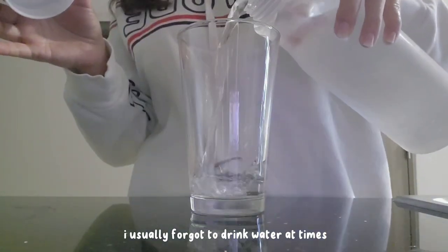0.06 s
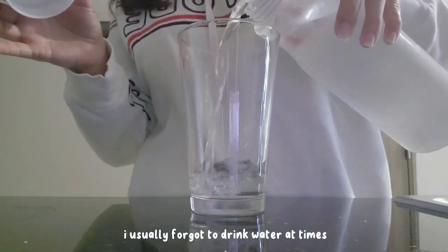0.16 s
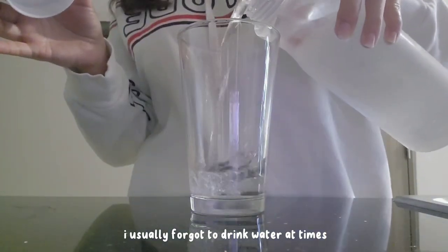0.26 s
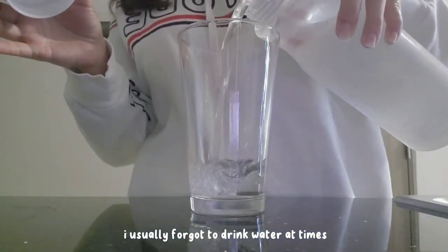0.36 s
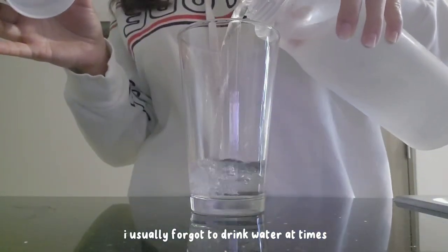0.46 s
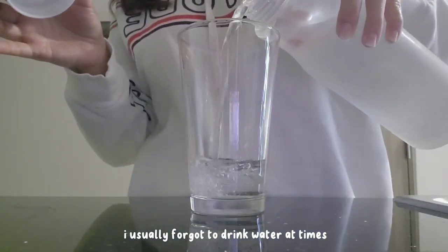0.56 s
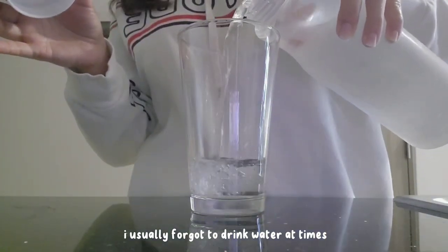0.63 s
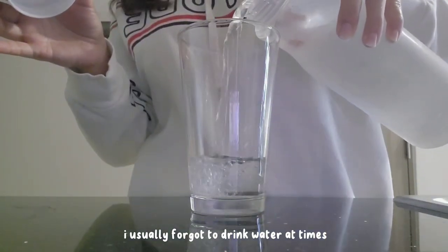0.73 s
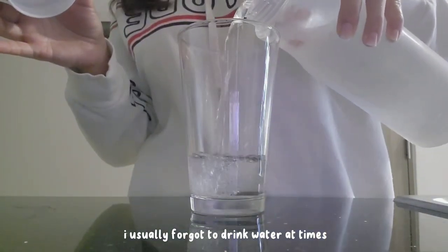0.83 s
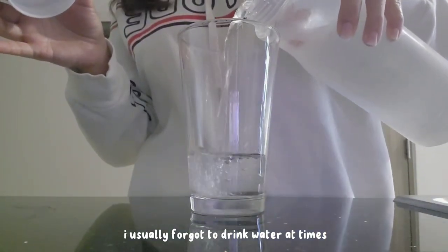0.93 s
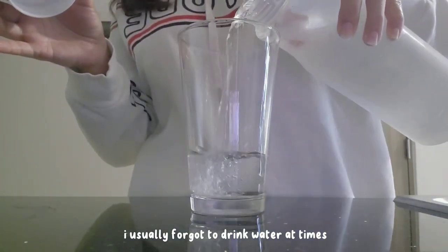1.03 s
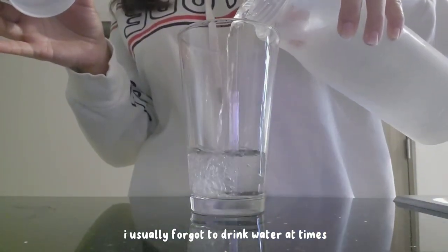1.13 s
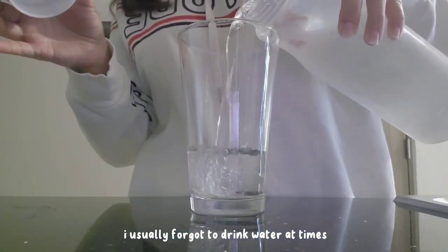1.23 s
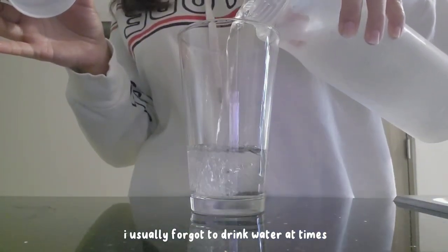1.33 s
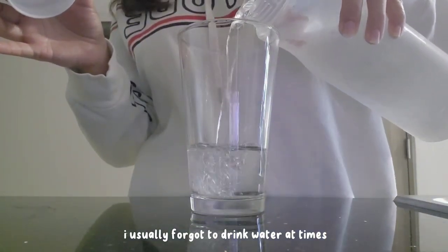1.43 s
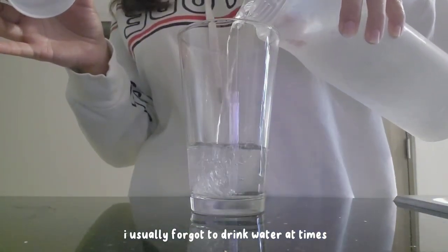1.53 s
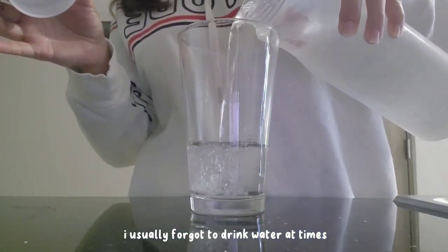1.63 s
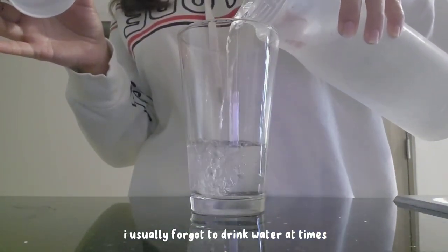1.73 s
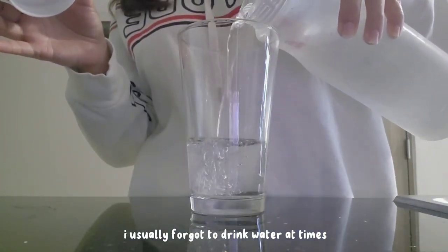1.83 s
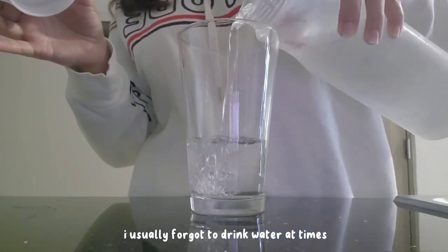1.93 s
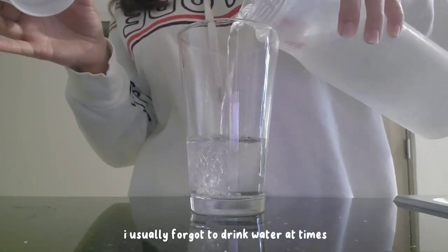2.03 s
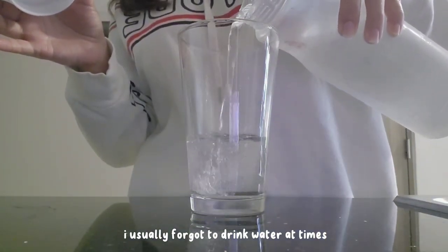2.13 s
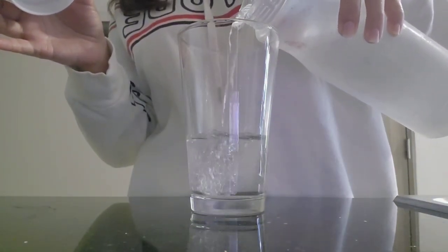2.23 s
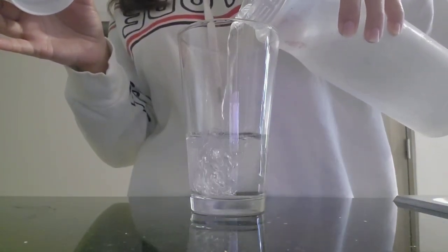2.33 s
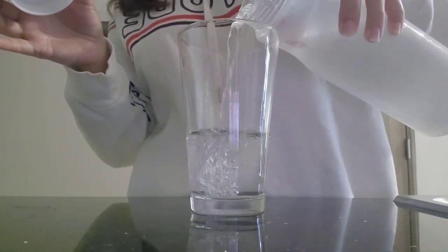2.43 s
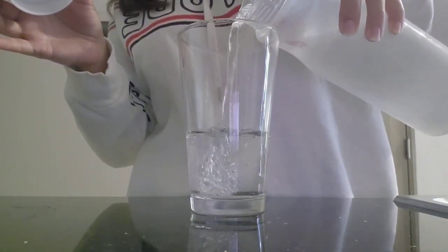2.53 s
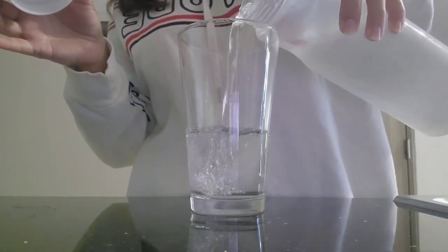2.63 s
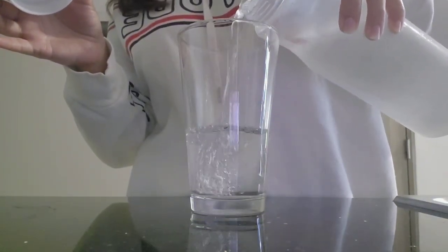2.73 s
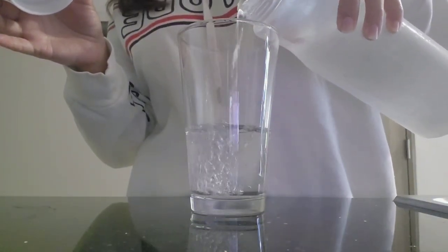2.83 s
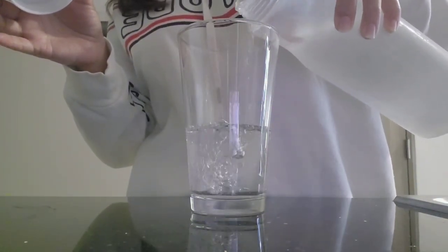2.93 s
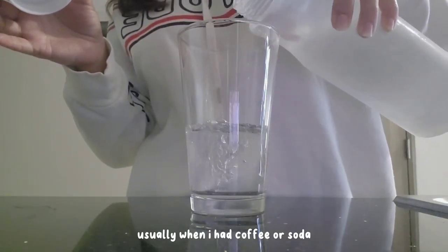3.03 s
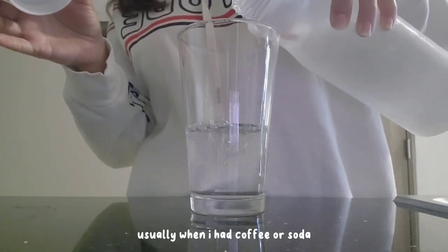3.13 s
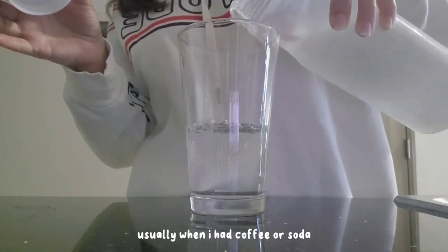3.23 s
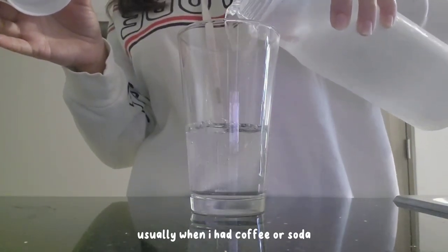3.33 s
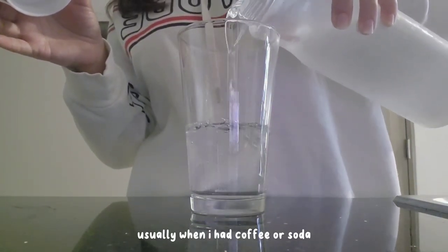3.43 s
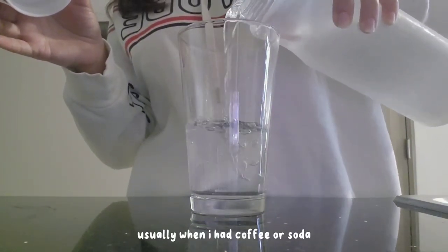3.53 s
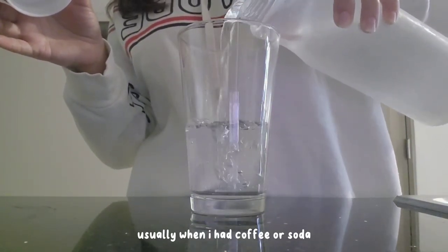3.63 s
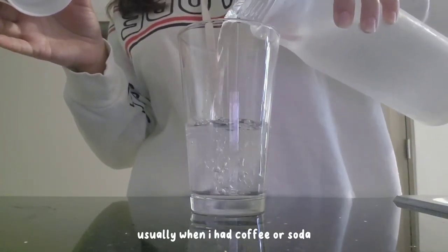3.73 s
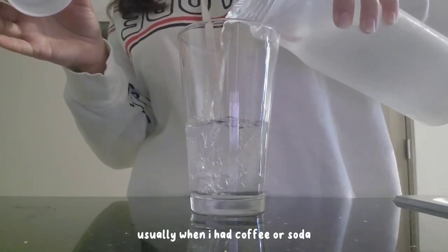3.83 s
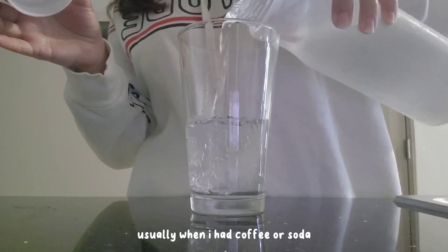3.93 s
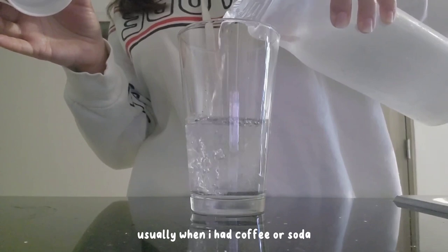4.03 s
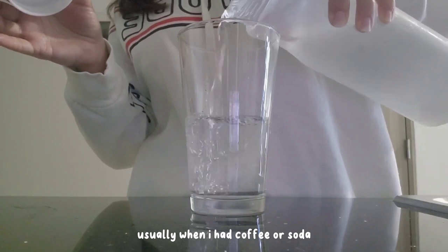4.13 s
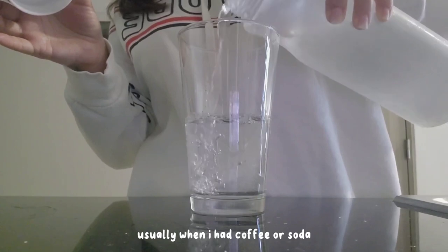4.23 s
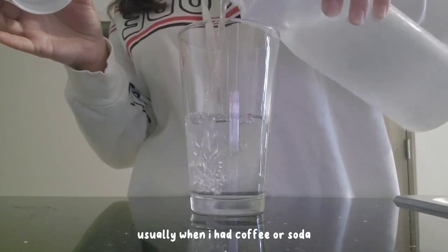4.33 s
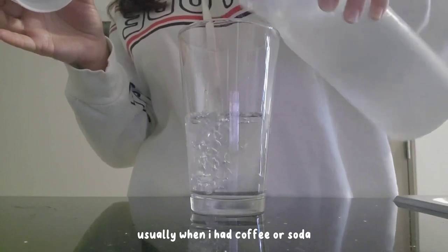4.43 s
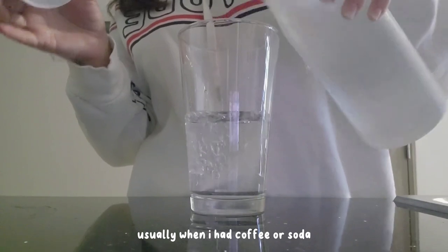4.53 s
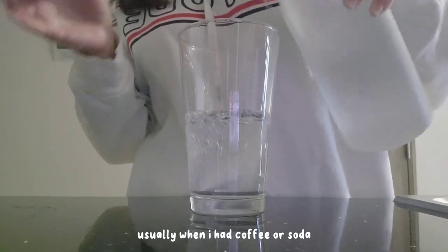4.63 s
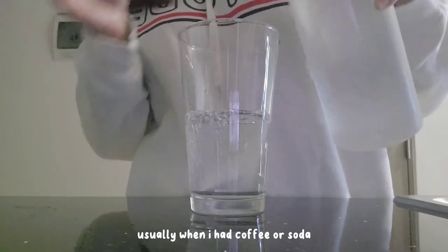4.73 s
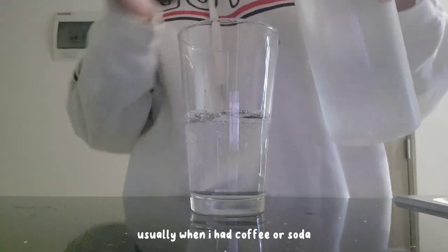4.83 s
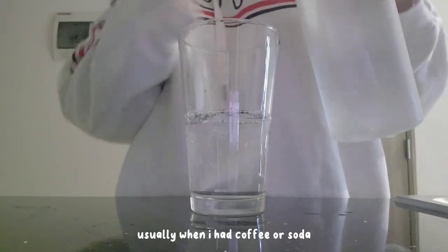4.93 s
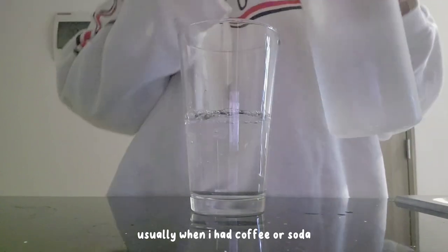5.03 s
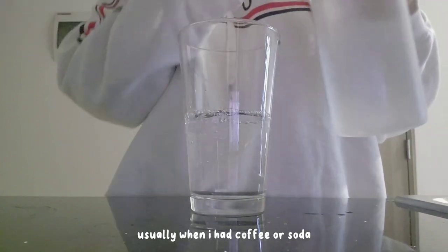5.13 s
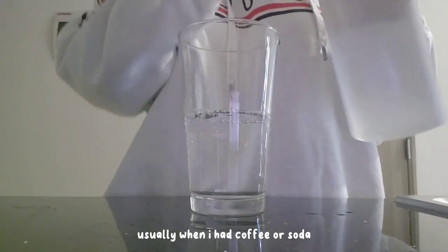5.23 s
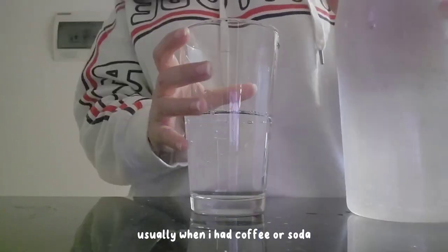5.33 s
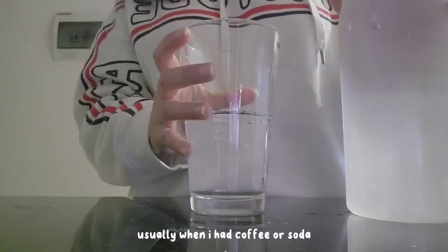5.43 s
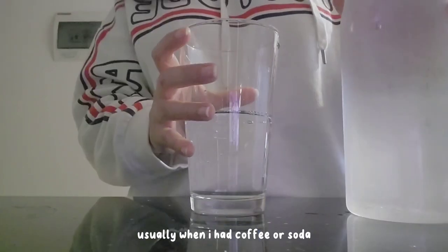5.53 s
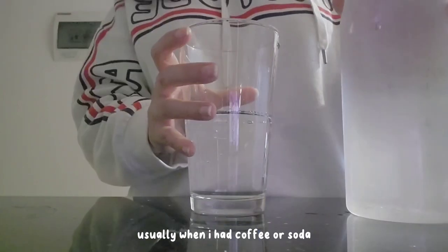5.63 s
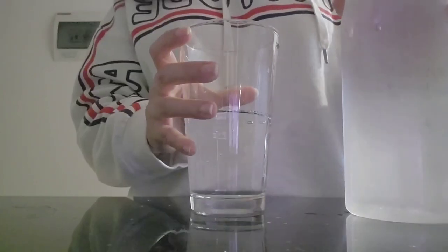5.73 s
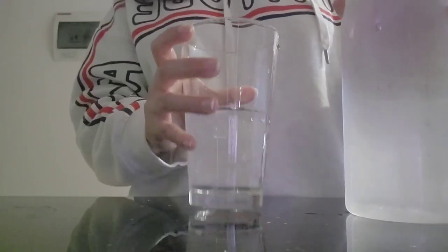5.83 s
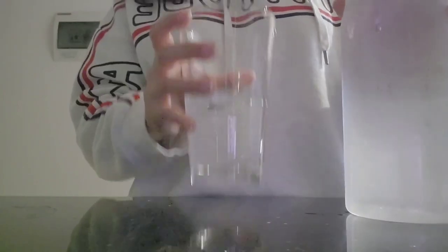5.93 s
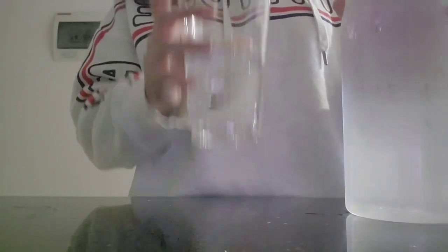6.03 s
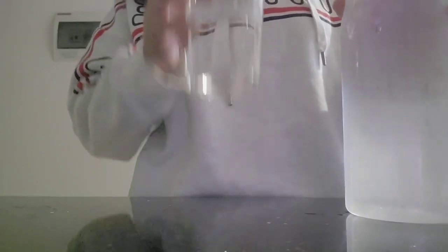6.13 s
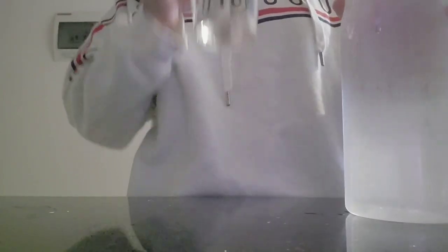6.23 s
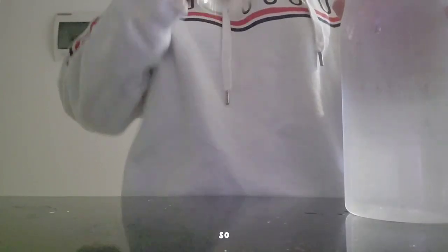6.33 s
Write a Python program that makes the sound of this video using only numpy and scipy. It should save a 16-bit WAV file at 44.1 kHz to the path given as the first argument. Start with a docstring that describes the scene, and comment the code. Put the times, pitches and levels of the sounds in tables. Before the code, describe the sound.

Water gurgles into a tall glass in two pours, pitch slowly climbing, then a plastic jug clacks onto the table with soft booms.

```python
"""In a small room, close to a pair of microphone ports, a plastic jug fills a tall glass in two pours.
Trapped bubbles ring the air above the water, whose tone mostly climbs as the glass fills.
Under them a bubble plume throbs, small bubbles fizz and drops spatter, all built from decaying sines
and coloured noise. A sleeve rustles, then the jug's struck modes clack on the table and the top booms."""
import sys
import numpy as np
from scipy import signal
from scipy.fft import rfft, irfft, next_fast_len
from scipy.io import wavfile
from scipy.ndimage import uniform_filter1d, map_coordinates

SR = 44100
rng = np.random.default_rng(int(sys.argv[2]) if len(sys.argv) > 2 else 0)


def generate_wav(signal):
    """Clip the signal to [-1, 1] and save it as 16-bit WAV at the path in sys.argv[1]."""
    frames = np.transpose(np.atleast_2d(signal))
    scaled = np.clip(frames, -1, 1) * 32767
    pcm = np.round(scaled).astype(np.int16)
    wavfile.write(sys.argv[1], SR, pcm)


N = 281358


def amp(db):
    """Decibels to gain."""
    return 10 ** (np.asarray(db) / 20)


def unit(x):
    """Scale to rms 1."""
    return x / np.sqrt(np.mean(x ** 2) + 1e-20)


def along(points, hz):
    """Read (f/Hz, value) points on a log frequency axis."""
    f, v = np.transpose(points)
    return np.interp(np.log(hz + 1), np.log(f), v)


def curves(rows, outside=None):
    """One value per sample for each column after the time."""
    s, *cols = np.transpose(rows)
    return [np.interp(np.arange(N) / SR, s, c, outside, outside) for c in cols]


def fade(t, t60):
    """Free decay, 60 dB in t60 (same unit as t)."""
    return np.exp(-np.log(1000) * t / t60)


def add(track, s, sound):
    """Mix a sound into a track from time s on."""
    part = track[max(round(s * SR), 0):][:len(sound)]
    part += sound[:len(part)]


def filtered(x, response):
    """Apply a complex response of frequency to x."""
    m = next_fast_len(N + SR // 2)
    hz = np.fft.rfftfreq(m, 1 / SR)
    return irfft(rfft(x, m) * response(hz), m)[..., :N]


def coloured(x, spectrum, size=4096):
    """Causal (minimum-phase) filter of unit energy with the shape of the given spectrum."""
    cepstrum = irfft(np.log(amp(along(spectrum, np.fft.rfftfreq(size, 1 / SR))) + 1e-6))
    # fold the cepstrum onto positive times to make the filter causal
    cepstrum[1:size // 2] *= 2
    cepstrum[size // 2 + 1:] = 0
    kernel = irfft(np.exp(rfft(cepstrum)))
    return signal.fftconvolve(x, kernel / np.linalg.norm(kernel))[:len(x)]


def resonance(x, hz, width_hz):
    """A resonance of gain 1 that follows the curve hz."""
    turn = np.exp(2j * np.pi * np.cumsum(hz) / SR)
    pole = np.exp(-np.pi * width_hz / SR)
    # shift the resonance to 0 Hz, smooth, shift back
    return 2 * np.real(turn * signal.lfilter([1 - pole], [1, -pole], x / turn))


def burst(spectrum, t60, attack, grain_db):
    """A short puff of grainy, coloured noise with peak 1."""
    t = np.arange(SR // 5) / SR
    noise, grain = rng.standard_normal((2, len(t)))
    envelope = fade(t, t60) * (1 - np.exp(-t / attack))
    puff = coloured(noise * amp(grain_db * grain) * envelope, spectrum)
    return puff / np.abs(puff).max()


def ring(modes, attack, scatter_db, blur):
    """Struck modes at slightly new strengths, their phases wandering; peak 1."""
    t = np.arange(SR // 2) / SR
    sound = np.zeros(len(t))
    for hz, db, t60 in modes:
        wander = blur * np.sqrt(hz / SR) * np.cumsum(rng.standard_normal(len(t)))
        strength = amp(db + scatter_db * rng.normal())
        sound += strength * fade(t, t60) * np.sin(2 * np.pi * hz * t + wander)
    sound *= 1 - np.exp(-t / attack)
    return sound / np.abs(sound).max()


def bubble(hz, cycles, onset_cycles, rise):
    """A bubble swells, rings out over some cycles and rises in pitch by the fraction rise."""
    age = np.arange(int(cycles * SR / hz) + 2) * hz / SR  # in cycles
    swell = (1 - np.exp(-(age / onset_cycles) ** 2)) * fade(age, cycles)
    return swell / swell.max() * np.sin(2 * np.pi * age * (1 + rise * (age / cycles - .5) / 2))


def swarm(centre_hz, per_second, spread, size_db, cycles, onset_cycles):
    """Random bubbles around a pitch curve; spread is in log pitch."""
    track, count = np.zeros(N), int(per_second * N / SR)
    for k, (when, pitch, size, life) in enumerate(rng.standard_normal((count, 4))):
        s = np.clip((k + 2 * when) / per_second, 0, (N - 1) / SR)
        hz = min(centre_hz[int(s * SR)] * np.exp(spread * pitch), SR / 2)
        one = bubble(hz, cycles * np.exp(life / 2), onset_cycles, rise=.012)
        add(track, s, amp(size_db * size) * one)
    return track


def steady(x, size=6000):
    """Hold the slow level near rms 1 and keep the fast grain."""
    power = uniform_filter1d(uniform_filter1d(x ** 2, size), size // 2)
    return x / np.sqrt(np.abs(power) + 1e-12)


def wobble(rate):
    """A smooth random curve, rate knots a second."""
    return map_coordinates(rng.standard_normal(int(N * rate / SR) + 4), [np.arange(N) * rate / SR])


# colour of the empty room: f/Hz, relative level/dB per Hz
ROOM_NOISE = [(20, -33), (42, 2.5), (85, -5), (120, -4), (138, -12.5), (156, -1.5), (178, -12.5),
              (250, -11.5), (310, -19.5), (400, -15.5), (560, -26.5), (1130, -18.5), (1900, -35),
              (2400, -30.5), (4000, -45.5), (8500, -55.5), (14000, -50)]
# overall level of the room noise: t/s, level/dB
ROOM_LEVEL = [(0, -51.5), (3.5, -52), (5.3, -51), (6.38, -51.5)]
# how alike it is at the two ports: f/Hz, left-right likeness (-1 to 1)
ROOM_ALIKE = [(60, 0.89), (150, 0.95), (380, 0.21), (950, -0.24), (2380, -0.1), (5980, -0.52),
              (15000, -0.11)]


def room_noise():
    """Steady room noise, nearly mono in the bass: mid and side noise shared out by likeness."""
    def mid_side(hz):
        turn = np.arccos(np.clip(along(ROOM_ALIKE, hz), -1, 1)) / 2
        return amp(along(ROOM_NOISE, hz)) * [np.cos(turn), np.sin(turn)]

    mid, side = filtered(rng.standard_normal((2, N)), mid_side)
    return amp(curves(ROOM_LEVEL)[0]) * unit(np.array([mid + side, mid - side]))


# strength of the stream in each pour, as the level of its fizz before the mix: t/s, level/dB
FIRST_POUR = [(0, -50.5), (.42, -56), (.56, -53), (.68, -58.5), (1.0, -57.5), (1.15, -60.5), (1.3, -56.5),
              (1.6, -62), (1.95, -67), (2.14, -55.5), (2.29, -65.5), (2.55, -61), (2.78, -63), (2.9, -68),
              (3.1, -57), (3.27, -64), (3.36, -77.5)]
SECOND_POUR = [(3.69, -69), (3.73, -60), (3.79, -56), (4.08, -67), (4.18, -58.5), (4.33, -71.5),
               (4.43, -62.5), (4.74, -65.5), (4.82, -79.5)]
FULL_STREAM_DB = -55  # fizz of a full stream


def stream():
    """Strength of the stream in dB against a full one; as good as silent between the pours."""
    first, = curves(FIRST_POUR, outside=-200)
    second, = curves(SECOND_POUR, outside=-200)
    return np.maximum(first, second) - FULL_STREAM_DB


# gurgle, plume and spray (one row each) between gulps: level/dB at full stream, dB per dB of stream
STEADY_POUR = [(-55.5, .5), (-65, .5), (-74, 1.64)]
# the stream plunges and drags a run of large bubbles under:
# t/s, length/s, gurgle level/dB, plume level/dB, spray level/dB
GULPS = [(0.178, 0.19, -46, -72, -68), (0.517, 0.3, -42, -57, -73), (0.821, 0.34, -45, -56, -78.5),
         (1.2, 0.31, -54, -57, -79), (1.77, 0.2, -55, -68, -88), (2.034, 0.18, -50, -60, -75),
         (2.375, .36, -49, -63, -89), (2.944, 0.2, -47, -56, -78), (3.122, 0.093, -41, -52, -70),
         (3.82, .13, -46, -50, -66), (4.077, .13, -56, -60, -75), (4.393, .08, -55, -65, -76),
         (4.591, .12, -51, -55, -73)]
GULP_ATTACK_S, GULP_T60_S = 0.022, 0.2


def flow():
    """Gains of gurgle, plume and spray: a little with the steady stream, much more in each gulp."""
    t, strength_db = np.arange(N) / SR, stream()
    gains = np.array([amp(db + grows * strength_db) for db, grows in STEADY_POUR])
    for s, length, *levels_db in GULPS:
        attack = np.clip((t - s) / GULP_ATTACK_S, 0, 1)
        swell = attack * fade(np.maximum(t - s - length, 0), GULP_T60_S)
        gains += np.outer(amp(levels_db), swell)
    return gains


# lowest resonance of the air above the water: t/s, f/Hz
AIR_TONE = [(0, 722), (.65, 734.5), (1.1, 758), (1.6, 846), (2.2, 842.6), (2.9, 870), (3.12, 859),
            (3.25, 905), (3.8, 893), (4.15, 982), (4.5, 925)]
# throb of the bubble plume as a whole, lower as it grows; also played by plume(): t/s, f/Hz
PLUME_TONE = [(0, 630), (.7, 544), (1, 488), (1.3, 390), (2.2, 356.5), (3.2, 353.7), (3.45, 374.6),
              (3.8, 710), (3.92, 602), (4.02, 475), (4.2, 401), (4.5, 391), (4.68, 357.4)]
# the largest bubbles, also heard in plume() and fizz(): t/s, relative level/dB, f/Hz
GLUGS = [(0.177, -22, 842), (0.238, -24, 693), (0.268, -32, 826), (0.289, -27, 789), (0.35, -25.5, 827),
         (0.536, -28, 854), (0.58, -19, 695), (0.601, -18.5, 717), (0.639, -20, 672), (0.653, -24.5, 736),
         (0.729, -23, 683), (0.761, -20, 641), (0.852, -26.5, 752), (0.894, -30.5, 757), (0.987, -30, 637),
         (1.107, -30.5, 734), (1.152, -36, 792), (1.337, -31, 1220), (1.91, -38.5, 878),
         (2.062, -34.5, 850), (2.085, -32, 875), (2.173, -27.5, 867), (2.198, -28.5, 870),
         (2.364, -33, 898), (2.398, -34, 850), (2.574, -37, 860), (2.703, -32, 864), (2.974, -33, 859),
         (3.061, -30, 822), (3.091, -28.5, 850), (3.13, -26, 875), (3.148, -19, 863), (3.166, -16, 901),
         (3.191, -20.5, 890), (3.238, -22, 895), (3.764, -23.5, 1194), (3.84, -23, 846),
         (3.886, -24.5, 850), (3.938, -27, 1114), (4.088, -39, 1010), (4.154, -37, 934), (4.196, -39, 982),
         (4.444, -33, 933), (4.602, -29, 992), (4.637, -32.5, 906), (4.671, -17, 915), (4.698, -26, 891)]
# colour of the bubble crowd: f/Hz, relative level/dB per Hz
GURGLE = [(300, -27.5), (520, -25), (650, -11), (900, -2.5), (1040, -9.5), (1230, 10.5), (1400, -1.5),
          (1750, -26.5), (3000, -48.5)]
YOUNG_HZ, GROWN_HZ = 590, 380  # pitch of a young and of a full-grown plume
# ring of the air under a bubble in tune with it; mistuning that halves its power
AIR_RING_DB, AIR_REACH_HZ = -8, 120
# while the plume is young, large bubbles die sooner and ring the air less
GROWN_CYCLES, YOUNG_CYCLES, YOUNG_AIR_DB = 40, 22, -6


def gurgle():
    """Large bubbles, trapped by the stream, ring the air column in the glass."""
    air_hz, = curves(AIR_TONE)
    plume_hz, = curves(PLUME_TONE)
    young = np.clip((plume_hz - GROWN_HZ) / (YOUNG_HZ - GROWN_HZ), 0, 1)
    air_gain = amp(YOUNG_AIR_DB * young)
    crowd_hz = air_hz * (1.08 - .17 * young)  # lower while the plume is young
    crowd = swarm(crowd_hz, per_second=560, spread=0.22, size_db=5, cycles=34, onset_cycles=1.4)
    crowd = coloured(crowd, GURGLE)
    crowd = steady(crowd + amp(18) * air_gain * resonance(crowd, air_hz, width_hz=26))
    glugs = np.zeros(N)
    for (s, db, hz), (lag, pitch) in zip(GLUGS, rng.uniform(-0.975, 1, (len(GLUGS), 2))):
        now = round(s * SR)
        life = GROWN_CYCLES + (YOUNG_CYCLES - GROWN_CYCLES) * young[now]
        glug = bubble(hz, life, onset_cycles=3.0, rise=0.0031)
        add(glugs, s - .002, amp(db - 2.26) * glug)
        # the air above swells more slowly and outlasts the bubble, louder the closer their pitches
        in_tune = 1 / np.hypot(1, (hz - air_hz[now]) / AIR_REACH_HZ)
        air = bubble(air_hz[now], cycles=125, onset_cycles=8, rise=0)
        add(glugs, s - .002, amp(db + AIR_RING_DB) * in_tune * air_gain[now] * air)
        # each large bubble sheds a quieter one, mostly higher
        shed = bubble(1240 * np.exp(.09 * pitch), cycles=44, onset_cycles=2.5, rise=.01)
        add(glugs, s + .004 + 0.0025 * lag, amp(db - 16.5) * air_gain[now] * shed)
    return glugs + flow()[0] * crowd


PLUME_LAG_S = .04  # the plume answers the stream a little later


def plume():
    """The cloud of bubbles under the stream throbs at one low pitch, jolted by each large bubble."""
    plume_hz, = curves(PLUME_TONE)
    throb = swarm(plume_hz, per_second=160, spread=0.098, size_db=5.0, cycles=16, onset_cycles=0.8)
    throb = steady(resonance(throb, plume_hz, width_hz=47))
    jolts = np.zeros(N)
    for s, db, _ in GLUGS:
        jolt = bubble(plume_hz[round(s * SR)], cycles=70, onset_cycles=2.0, rise=0)
        add(jolts, s, amp(db - 25.5) * jolt)
    t = np.arange(N) / SR
    return jolts + np.interp(t - PLUME_LAG_S, t, flow()[1]) * throb


# colour of the small bubbles in the glass: f/Hz, relative level/dB per Hz
FIZZ = [(1000, -21.5), (1480, 1), (1800, -12), (2070, 3), (2280, -3), (2600, 1), (2870, -1.5), (3100, -8),
        (3400, -2.5), (4200, -6.5), (5500, -15.5), (6500, -18), (8300, -25), (12000, -18)]
# the clearest small bubbles: t/s, relative level/dB, f/Hz
PLINKS = [(0.0662, -36, 1540), (0.0904, -33.5, 3340), (0.1478, -32.5, 2630), (0.186, -34, 5610),
          (0.2304, -40, 2070), (0.2864, -35.5, 2050), (0.5615, -31, 3550), (0.9943, -38.5, 3300),
          (1.2715, -35, 3320), (1.3363, -35, 2460), (1.4561, -42, 2060), (2.2164, -35.5, 2080),
          (2.3501, -47, 3950), (2.7964, -37, 2690), (3.0905, -35.5, 2595), (3.1683, -37.5, 2660),
          (3.234, -40, 2510), (3.7709, -30.5, 2630), (3.8287, -40, 5360), (3.9802, -32, 2104),
          (4.5895, -39.5, 2770), (4.6693, -33.5, 2650), (4.7004, -30.5, 2910)]
# bubbles still rising: t/s, level/dB before the mix
AFTER_FIZZ = [(0, -106), (3.2, -74.5), (3.45, -75.5), (3.7, -76.5), (4.7, -80), (5, -84.5), (5.4, -90),
              (6.38, -100)]
SPLASH_DB = -25  # splash that traps a large bubble, against that bubble's listed level


def fizz():
    """Small bubbles tinkle in the upper resonances of the glass; a few go on rising after each pour."""
    crowd = swarm(np.full(N, 3500), per_second=1900, spread=0.462, size_db=7.5, cycles=26,
                  onset_cycles=2.2)
    # the stream breaks up, so bubbles come in clumps
    crowd = coloured(crowd, FIZZ) * amp(2.2 * wobble(27.92))
    late = swarm(np.full(N, 3700), per_second=360, spread=0.3, size_db=4.5, cycles=45, onset_cycles=3)
    plinks = np.zeros(N)
    for s, db, hz in PLINKS:
        add(plinks, s - .001, amp(db - .5) * bubble(hz, cycles=42, onset_cycles=2.8, rise=.01))
        # the splash that traps it
        add(plinks, s - .002, amp(db - 12) * burst(FIZZ, t60=0.081, attack=.003, grain_db=5.5))
    for s, db, _ in GLUGS:
        add(plinks, s - .002, amp(db + SPLASH_DB) * burst(FIZZ, t60=0.03, attack=.002, grain_db=4))
    poured = amp(stream() + FULL_STREAM_DB) * steady(crowd)
    return plinks + poured + amp(curves(AFTER_FIZZ)[0]) * unit(late)


# the largest drops bursting on the surface: t/s, relative level/dB
SPATS = [(0.1825, -42.5), (0.5801, -48), (0.6664, -46), (0.7495, -48.5), (0.854, -50.5), (1.1528, -48.5),
         (1.3513, -56), (1.4414, -56.5), (1.9091, -48.5), (2.151, -46.5), (2.5421, -44.5), (2.804, -45.5),
         (2.9751, -51.5), (3.0908, -41), (3.1293, -45), (3.8318, -45.5), (3.9689, -44.5), (4.0058, -41),
         (4.115, -49.5), (4.4054, -51), (4.6927, -48)]
# colour of the droplets: f/Hz, relative level/dB per Hz
SPRAY = [(600, -24.5), (2000, 1), (5500, 6), (8300, -2), (11500, 4), (15500, 2.5)]
DROP_BUBBLE_HZ, DROP_BUBBLE_DB = 5900, -3  # typical tiny bubble; its level against the listed one


def spray():
    """Tiny droplets crackle; larger ones burst into a shower of ticks and leave a tiny bubble."""
    droplets = swarm(np.full(N, 10000), per_second=1000, spread=0.51, size_db=5.5, cycles=28,
                     onset_cycles=2.3)
    spats = np.zeros(N)
    for (s, db), pitch in zip(SPATS, rng.standard_normal(len(SPATS))):
        add(spats, s - .001, amp(db + 4) * burst(SPRAY, t60=0.02, attack=0.0039, grain_db=6.5))
        hz = DROP_BUBBLE_HZ * np.exp(.15 * pitch)
        tiny = bubble(hz, cycles=48, onset_cycles=3.3, rise=.01)
        add(spats, s + .001, amp(db + DROP_BUBBLE_DB) * tiny)
    return spats + flow()[2] * steady(coloured(droplets, SPRAY))


# cloth rustle: t/s, level/dB
SLEEVE = [(4.75, -86), (4.95, -74.5), (5.06, -62.5), (5.2, -70), (5.38, -56), (5.42, -100)]
# colour of the cloth: f/Hz, relative level/dB per Hz
CLOTH = [(1000, -18.5), (2500, 12), (5800, 2), (8300, -6.5), (12000, -6.5), (15500, -12)]


def sleeve():
    """A sleeve rustles as the jug is lowered: coloured noise, independent at the two ports."""
    cloth = np.array([coloured(noise, CLOTH) for noise in rng.standard_normal((2, N))])
    return amp(curves(SLEEVE, outside=-120)[0]) * cloth


# the jug's base meets the table: t/s, relative level/dB, then ring/dB and crack/dB against it
CLACKS = [(5.253, -28.5, -8.5, -11), (5.2599, -9, -3, -20.5), (5.269, -18, -5.5, -18.5),
          (5.2840, -20, -2.5, -3.5), (5.3599, -22, -18, -1)]
# modes of the jug: f/Hz, relative level/dB, t60/s
JUG = [(401.3, -18, 0.13), (690, -19.5, 0.022), (965, -5, 0.055), (1053, -12, 0.092), (1330, -5, 0.084),
       (1360, 3.5, 0.065), (1386, -8, 0.054), (1610, -1.5, 0.065), (2320, -13, 0.037), (3002, -7.5, 0.03),
       (3690, -23, 0.068), (5100, -25, 0.053), (5950, -15, 0.055)]
# colour of the contact noise: f/Hz, relative level/dB per Hz
CRACK = [(150, -14), (400, -6.5), (800, 2.5), (1100, -11.5), (1450, 1), (2000, -22.5), (3300, -16.5),
         (4500, -22), (6000, -21.5), (8500, -31.5), (15500, -27.5)]


def jug():
    """The jug's base clacks down, rim first, and rocks flat: struck modes with a crack of noise."""
    track = np.zeros(N)
    for s, db, ring_db, crack_db in CLACKS:
        shell = ring(JUG, attack=0.0014, scatter_db=2.5, blur=0.26)
        add(track, s, amp(db + ring_db - 0.5) * shell)
        crack = burst(CRACK, t60=0.044, attack=0.0006, grain_db=2.5)
        add(track, s, amp(db + crack_db) * crack)
    return track


# soft blows on the table: t/s, boom level/dB, knock level/dB (before the mix)
THUMPS = [(5.455, -15.5, -34), (5.567, -17, -42), (5.603, -22, -44), (5.718, -25.5, -44), (5.759, -26, -50),
          (5.81, -38, -37), (6.024, -35.5, -68)]
# modes of the table top: f/Hz, relative level/dB, t60/s
TABLE = [(85.2, -13, 0.42), (110.7, -1.5, 0.22), (165, -21, 0.07), (223.3, -19.5, 0.12), (319, -25.5, 0.1),
         (394, -39.5, 0.23), (447, -34, 0.092), (617, -46, 0.12)]
# colour of the knock: f/Hz, relative level/dB per Hz
KNOCK = [(100, -5), (350, 3.5), (600, -8), (1100, -9), (1800, -34.5), (2500, -25.5), (5000, -52),
         (9000, -69), (15000, -82)]


def table():
    """The table top's low modes boom under each soft blow, with a short knock of noise."""
    track = np.zeros(N)
    for s, boom_db, knock_db in THUMPS:
        add(track, s, amp(boom_db) * ring(TABLE, attack=0.02, scatter_db=5.5, blur=0.015))
        add(track, s - .002, amp(knock_db) * burst(KNOCK, t60=0.058, attack=0.0014, grain_db=-3))
    return track


def placed(x, path):
    """Level and phase of a source at the left and right microphone port."""
    path = np.array(path)

    def half(hz):
        """Half the left-right difference, as log gain and phase."""
        level = along(path[:, :2], hz) * np.log(10) / 40
        return level + .5j * along(path[:, ::2], hz)

    return filtered(x, lambda hz: np.exp([half(hz), -half(hz)]))


# decay of the room's diffuse tail: f/Hz, t60/s
ROOM_T60 = [(150, 0.35), (900, 0.32), (3000, 0.1), (12000, 0.3)]
EARLY_T60_S = .05  # decay of the first echoes


def room(x, early_db, size=8192):
    """Dense first echoes, then a diffuse tail; the echoes are redrawn at regular short intervals."""
    wet = np.zeros((2, N))
    for start in range(0, N, size):
        hz, t, z = signal.stft(rng.standard_normal((2, SR // 3)), SR, nperseg=256)
        decay = fade(t, along(ROOM_T60, hz)[:, None]) + amp(early_db) * fade(t, EARLY_T60_S)
        tails = signal.istft(z * decay, SR, nperseg=256)[1]
        for side, tail in zip(wet, tails):
            echo = signal.fftconvolve(x[start:start + size], tail / np.linalg.norm(tail))
            add(side, start / SR + .002, echo)
    return wet


# paths from glass and jug to the two microphone ports: f/Hz, left-right level/dB, left lead/rad
GLASS_PATH = [(352, -1.5, 1), (840, 3.5, 0.5), (1160, -1.5, -1.4), (1700, -7, 1.5), (2400, -4.2, 1.7),
              (3980, -3.5, 1.2), (10000, 1.5, -0.12)]
JUG_PATH = [(200, 2, -0.96), (800, 4.8, -0.95), (1360, -10.5, -0.61), (2600, 3, -1.2), (10000, -0.5, -1)]


def scene():
    """Glass and jug on their own paths to the ports, the boom slightly right, all in one small room."""
    hiss, tinkle, body, low = room_noise(), fizz(), gurgle(), plume()
    ticks, rustle, clack, boom = spray(), sleeve(), jug(), table()
    water = low + body + amp(-2.5) * tinkle + amp(-0.5) * ticks
    direct = placed(water, GLASS_PATH) + placed(clack, JUG_PATH) + boom * amp([[-.6], [.6]])
    # each source excites the room by its own amount
    sent = amp(-4.5) * low + amp(-10.5) * body + amp(0.5) * tinkle + amp(4.0) * ticks
    sent += amp(-5.5) * clack + amp(-20.5) * boom
    return direct + room(sent, early_db=4.0) + hiss + rustle


# gain over time, with one brief dip: t/s, level/dB
DIP = [(5.404, 1), (5.412, -25), (5.432, -31), (5.44, 0.5)]
TOP_HZ = 15800  # band limit


def record(dry):
    """The level dips briefly after the clack; nothing passes above the band limit."""
    return filtered(dry * amp(curves(DIP)[0]), lambda hz: hz < TOP_HZ)


dry = scene()
out = record(dry)
generate_wav(out)
```